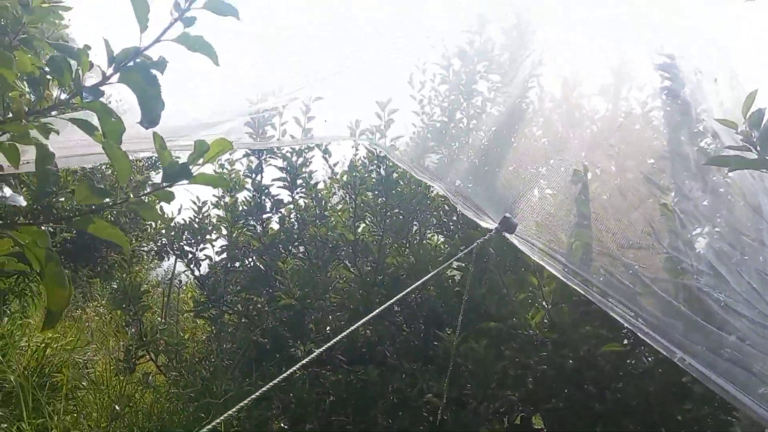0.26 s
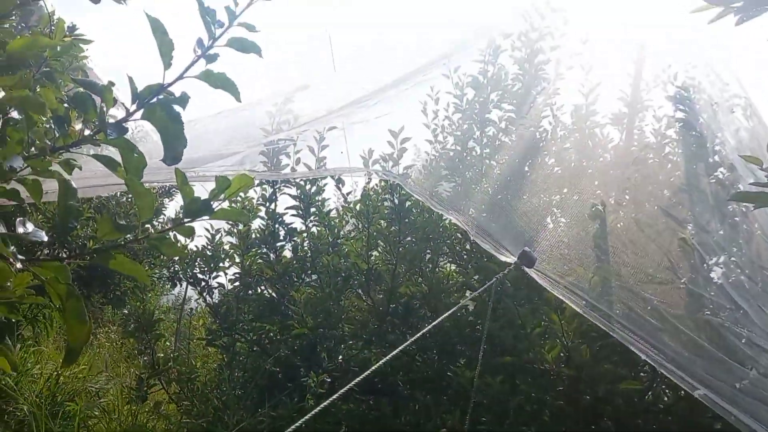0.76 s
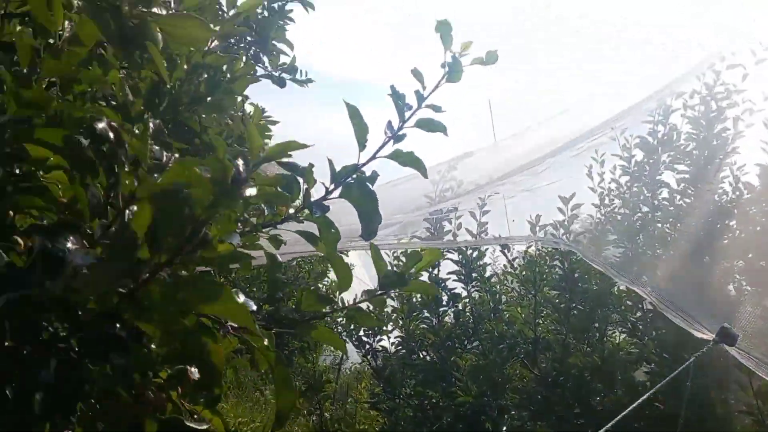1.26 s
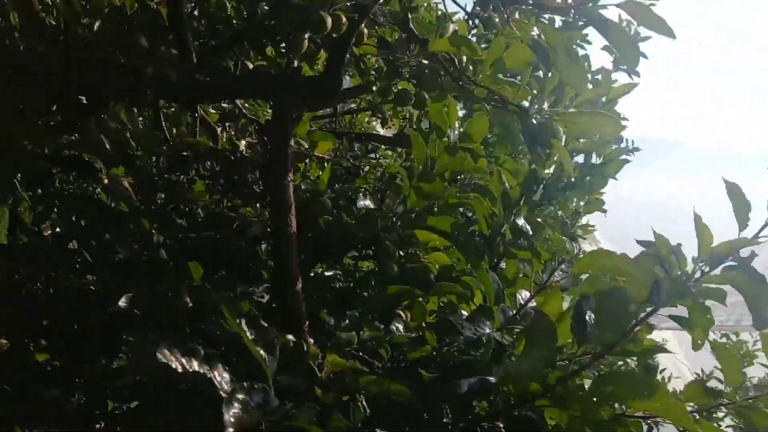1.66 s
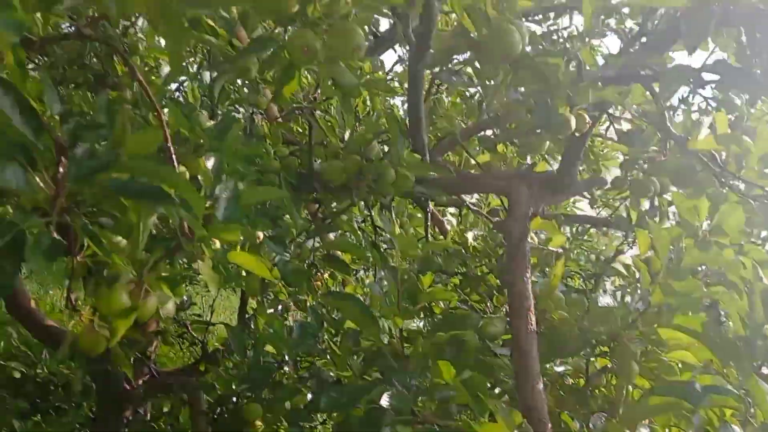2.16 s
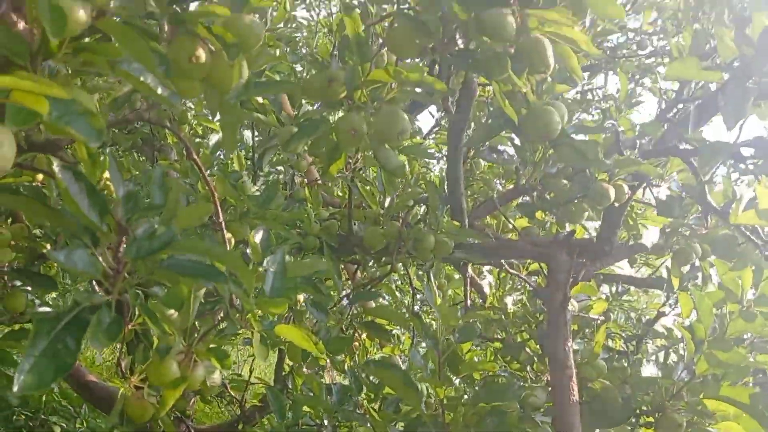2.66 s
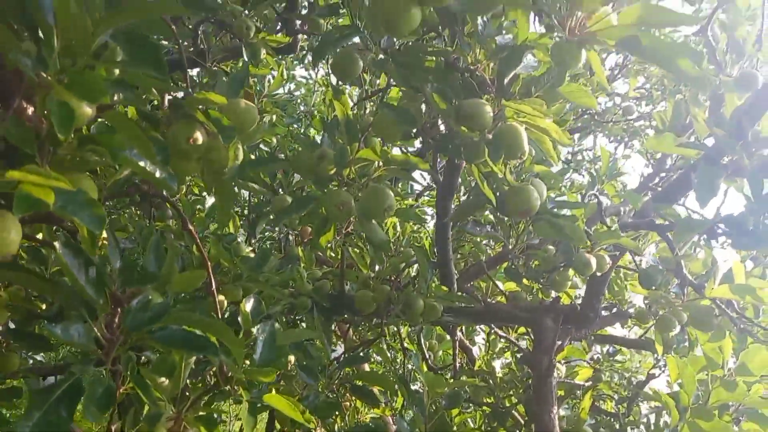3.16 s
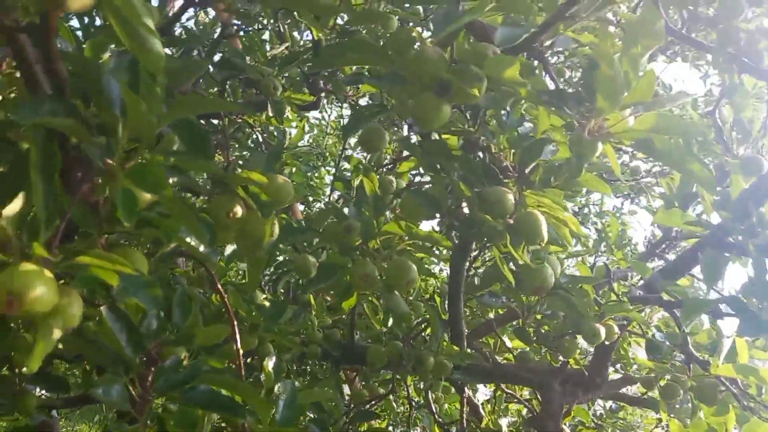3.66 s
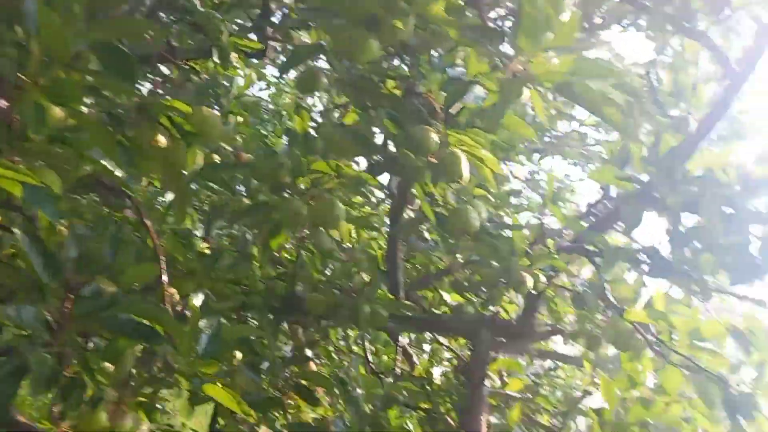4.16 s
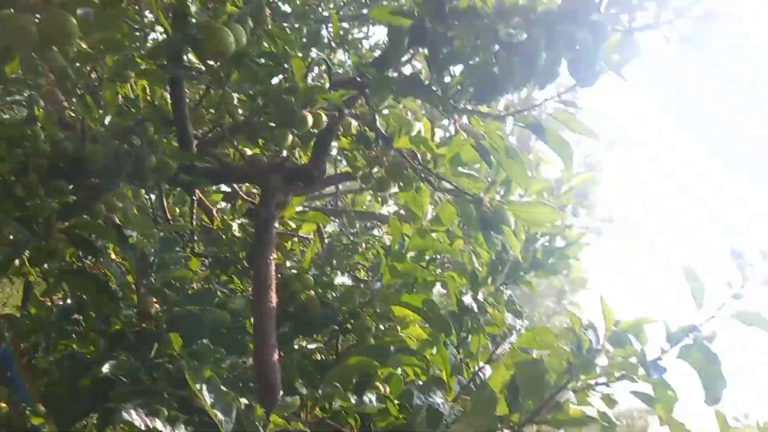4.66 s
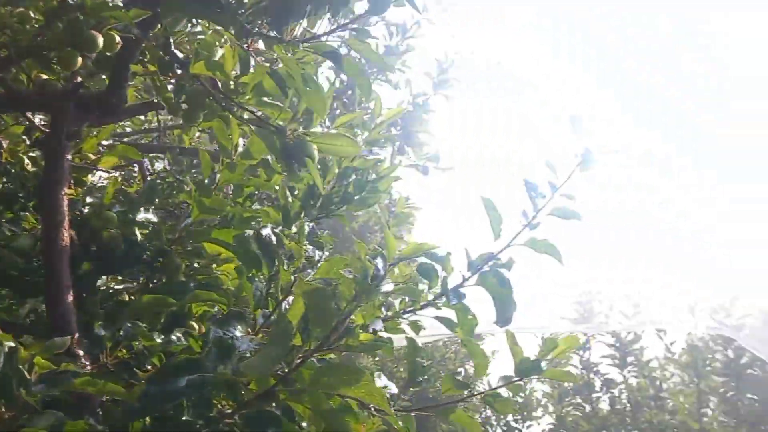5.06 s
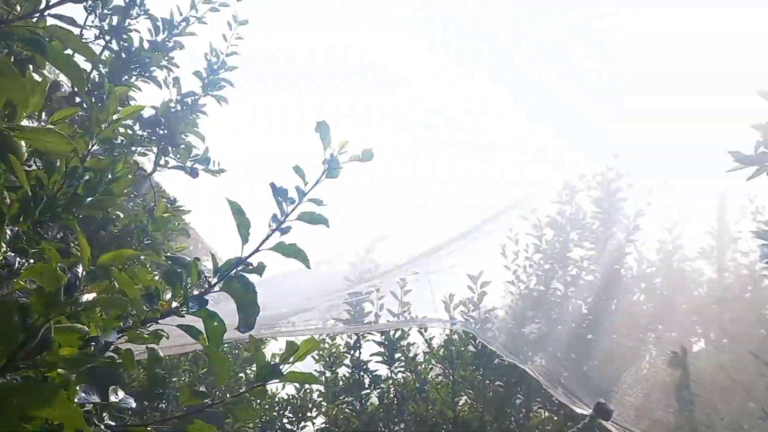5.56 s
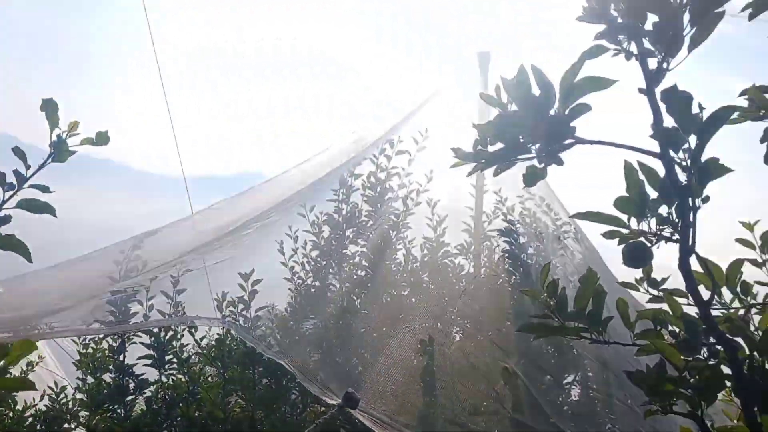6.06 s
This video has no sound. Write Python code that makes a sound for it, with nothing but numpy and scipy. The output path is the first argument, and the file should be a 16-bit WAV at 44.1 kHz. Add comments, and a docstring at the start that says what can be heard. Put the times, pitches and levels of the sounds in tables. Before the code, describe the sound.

In an open orchard, a hose-fed spray gun a few metres to the right hisses brightly in quick, uneven swells, slapping leaves and pattering dully on netting. Around three seconds it suddenly drops much quieter, then keeps pulsing softly. A small four-stroke pump engine throbs low and steady further off. A dull handling thud comes near two seconds; a faint bird chirps later. Handheld stereo phone.

```python
"""A spray gun's nozzle hisses, swelling with each pass; its jet rushes, slaps leaves and patters on netting.
A hose feeds it; it sweeps orchard trees a few metres from a phone, to the right, and ends nearly central.
Further off, the four-stroke single of the pump throbs over a low rumble, the case thuds and a bird chirps.
Water is droplet noise in bands, part direct and part scattered; the engine is a sum of firing-rate
harmonics; rumble and open air are filtered noise; thuds and chirps are enveloped sines."""
import sys
import numpy as np
from scipy import signal
from scipy.fft import rfft, irfft
from scipy.io import wavfile
from scipy.ndimage import uniform_filter1d, map_coordinates

SR = 44100
rng = np.random.default_rng(int(sys.argv[2]) if len(sys.argv) > 2 else 0)


def wrap_up_sound(samples):
    """Save the sound to the file named by the first command line argument, as 16-bit audio."""
    columns = np.atleast_2d(samples).T
    # keep every value between -1 and 1, then stretch to whole-number steps
    tamed = np.clip(columns, -1, 1)
    steps = np.round(tamed * 32767).astype(np.int16)
    wavfile.write(sys.argv[1], SR, steps)


N = 277830
T = np.arange(N) / SR
FREQS = np.maximum(np.fft.rfftfreq(N, 1 / SR), 1)
EARS = np.array([[1], [-1]])  # left, right

# Bearing of the gun. Each row: time in seconds, mean lag of the left port in ms.
BEARING_POINTS = [(0, 0.22), (.85, 0.24), (1.3, 0.28), (1.75, 0.51), (3.8, 0.53), (5.1, 0.51), (5.7, 0.21),
                  (6.0, 0.16), (6.3, 0.067)]
# Spray before passes and band trims; it drops away when the gun turns aside.
# Each row: time in seconds, nozzle hiss in dB, rush on foliage in dB, low wash in dB.
JET_LEVELS = [(0.0, -43.0, -44.5, -55.5), (0.9, -42.5, -46.5, -56), (1.2, -40.5, -45, -52.5),
              (2.05, -38, -43, -53.5), (2.3, -40.5, -44.0, -51), (3.16, -44, -47, -56),
              (3.2, -53.5, -58, -64.5), (4.05, -52.5, -54.5, -62.0), (5.3, -55, -59, -65),
              (5.55, -51.0, -50.5, -58.5), (5.97, -54.0, -56.0, -64.5), (6.3, -56, -54.5, -62.5)]


def undb(db):
    """Decibels to gain."""
    return 10 ** (np.asarray(db) / 20)


def curves(table):
    """Each column of a table, joined by straight lines in time."""
    times_s, *columns = np.transpose(table)
    return [np.interp(T, times_s, column) for column in columns]


def spectrum(points):
    """(Hz, value) points joined on a log-frequency axis."""
    hz, value = np.transpose(points)
    return np.interp(np.log(FREQS), np.log(hz), value)


def shape(x, gain):
    """Filter by a gain for every frequency."""
    return irfft(rfft(x) * gain, N)


def unit(x):
    """Scale so that the mean of the channels has standard deviation 1."""
    return x / np.std(np.atleast_2d(x).mean(axis=0))


def below(hz):
    """Gain of a smooth, steep low-pass."""
    return 1 / (1 + (FREQS / hz) ** 8)


def walk(rate_hz):
    """Random levels drawn at rate_hz and smoothed twice; standard deviation 1."""
    hold = max(int(SR / rate_hz), 1)
    steps = np.repeat(rng.standard_normal(N // hold + 1), hold)
    smooth = uniform_filter1d(uniform_filter1d(steps, hold), hold)
    return unit(smooth[:N])


def swell():
    """Change of the hiss in dB: every pass of the jet is one smooth, flat-topped arch."""
    # The jet swings towards the phone (+) or away (-) and back.
    # Each row: start in seconds, length in seconds, swell of the hiss in dB.
    passes = [(0.201, 0.119, 3.3), (0.351, 0.086, 2.2), (0.484, 0.052, 3.3), (0.564, 0.089, 2.1),
              (0.705, 0.192, 4.2), (0.927, 0.318, 4.3), (1.478, 0.095, -2.0), (1.597, 0.15, 1.8),
              (1.853, 0.217, 2.2), (2.099, 0.072, 1.7), (2.297, 0.114, -1.8), (2.418, 0.121, 2.5),
              (2.572, 0.12, 3.3), (2.724, 0.092, -1.7), (2.856, 0.202, 4.6), (3.284, 0.281, 4.8),
              (3.571, 0.076, -1.5), (3.827, 0.183, 3.6), (4.188, 0.044, 3.5), (4.312, 0.284, 5.3),
              (4.701, 0.414, 5.8), (5.362, 0.204, 3.8), (5.597, 0.217, 3.0), (5.792, 0.145, 7.4),
              (5.985, 0.053, 4.6), (6.048, 0.083, 3.7), (6.124, 0.18, 7.9)]
    flatness = 1.73  # wide mist cone levels off the top: near 0 = round arch, 3 = plateau
    total_db = 0
    for start_s, length_s, db in passes:
        along = np.clip((T - start_s) / length_s, 0, 1)
        total_db = total_db + db * np.tanh(flatness * np.sin(np.pi * along)) / np.tanh(flatness)
    return total_db


def droplets(spread_db, share):
    """Tiny impacts of uneven size, a power share of them sparse, merging into a hiss."""
    hits = rng.random(N) < 1 / 10
    sizes = undb(spread_db * np.minimum(rng.exponential(size=N), 5))
    impacts = unit(hits * sizes * rng.standard_normal(N))
    return np.sqrt(share) * impacts + np.sqrt(1 - share) * rng.standard_normal(N)


def mist():
    """Droplet noise at both ports: one part comes straight and lags on the left, leaves scatter the rest."""
    # Spray arriving straight from the gun. Each row: frequency in Hz, share of power 0-1.
    direct_share = [(500, .35), (1050, .67), (2000, .68), (2850, .74), (3800, .4), (5000, .3), (9000, .24),
                    (15000, .2)]
    straight, left, right = (droplets(spread_db=1.0, share=0.32) for _ in range(3))
    lag_ms = curves(BEARING_POINTS)[0] + 0.027 * walk(6)
    late = map_coordinates(straight, [np.arange(N) - lag_ms * SR / 1000], order=3, mode="wrap")
    share = spectrum(direct_share)
    direct = shape(np.array([late, straight]), np.sqrt(share))
    scattered = shape(np.array([left, right]), np.sqrt(1 - share))
    return direct + scattered


def spray():
    """Nozzle hiss, and rush and wash of the jet on trees; all follow passes and flutter as the jet breaks up."""
    # Spray colour, before each band is levelled. Each row: frequency in Hz, level in dB.
    spray_colour = [(250, -38), (600, -17), (950, -17), (1250, -13), (1550, -4.5), (1780, -8), (2060, -2.5),
                    (2450, -5), (3600, 0.5), (4800, 2.5), (6500, -1), (8300, -6), (12300, -3),
                    (16000, -4.5)]
    rush_follow, wash_follow = 1.43, 1.1  # dB per dB of hiss swell
    hiss_db, rush_db, wash_db = curves(JET_LEVELS)
    pass_db = swell()
    water = shape(mist(), undb(spectrum(spray_colour)))
    low, middle = below(2830), below(7050)
    flutter_db = 0.4 * walk(35) + 0.25 * walk(160)
    hiss_db = hiss_db + pass_db + 1.68 + 0.75 * walk(30)
    rush_db = rush_db + rush_follow * pass_db - 1.44 + 0.86 * walk(60)
    wash_db = wash_db + wash_follow * pass_db - 1.33 + 1.0 * walk(110)
    hiss = unit(shape(water, 1 - middle)) * undb(hiss_db)
    rush = unit(shape(water, middle - low)) * undb(rush_db)
    wash = unit(shape(water, low)) * undb(wash_db)
    return (hiss + rush + wash) * undb(flutter_db)


def slaps():
    """Brief band-limited splashes as the jet crosses leaves close by."""
    # Each row: peak time in seconds, level in dB before port shading, Gaussian sigma in seconds,
    # centre frequency in Hz, Gaussian width (sigma) in octaves.
    leaf_slaps = [(1.083, -39.5, 0.019, 3870, 0.22), (1.184, -52, 0.012, 1500, 0.97),
                  (2.143, -53, 0.023, 1790, 0.51), (5.491, -40.5, 0.013, 3100, 0.79),
                  (5.652, -52, 0.014, 2400, 0.44)]
    water, out = mist(), 0
    for peak_s, db, sigma_s, hz, octaves in leaf_slaps:
        band = np.exp(-0.5 * (np.log2(FREQS / hz) / octaves) ** 2)
        envelope = np.exp(-0.5 * ((T - peak_s) / sigma_s) ** 2)
        out = out + unit(shape(water, band)) * undb(db) * envelope
    return out


def netting():
    """The stretched net answers the water with a dull patter that follows the passes."""
    # Each row: time in seconds, level between passes in dB.
    net_levels = [(0, -74.5), (1.0, -70), (1.5, -63), (2.35, -68.5), (2.9, -80), (5.35, -74), (5.5, -67),
                  (6.3, -74.5)]
    net_follow = 0.96  # dB per dB of hiss swell
    patter = np.array([droplets(spread_db=-2.5, share=0.27) for _ in range(2)])
    body_db = spectrum([(150, -25), (400, -4), (650, 3), (1000, -6), (1600, -2), (4000, -50)])
    return unit(shape(patter, undb(body_db))) * undb(curves(net_levels)[0] + net_follow * swell())


def pump():
    """Each cycle an exhaust puff, then an intake gulp; trees scatter the upper notes differently to each ear."""
    # Engine speed before jitter. Each row: time in seconds, firings per second.
    firing_rate = [(0, 33.92), (1.1, 34.02), (1.7, 33.88), (1.95, 33.5), (2.35, 33.85), (2.62, 33.35),
                   (3.0, 33.75), (3.35, 34.0), (3.6, 33.8), (4.05, 33.85), (4.3, 33.6), (4.5, 33.75),
                   (4.72, 33.52), (5.25, 34.1), (5.6, 33.92), (5.9, 33.47), (6.3, 33.6)]
    # Pump loudness before a fixed trim. Each row: time in seconds, level in dB.
    throb_levels = [(0, -43.4), (3.1, -42.5), (3.25, -44.5), (6.3, -43.5)]
    # Exhaust harmonics. Each row: multiple of the firing rate, mean relative level in dB.
    exhaust_notes = [(5, 2), (6, 1), (7, -10), (8, -13.5), (9, -12), (10, -25), (11, -37), (12, -29),
                     (13, -26.5), (18, -24.5)]
    # Intake harmonics. Each row: multiple of the firing rate, relative level in dB.
    intake_notes = [(1, -25), (2, -0.5), (3, 0.5), (4, -57)]
    cycles = np.cumsum(curves(firing_rate)[0] * (1 + 0.0022 * walk(29.93))) / SR
    puff = 0
    for k, db in exhaust_notes:
        waver_db = 0.063 * k * walk(24.94)  # higher notes waver more
        puff = puff + undb(db + waver_db) * np.cos(2 * np.pi * k * cycles)
    intake_cycles = cycles - 0.3
    gulp = sum(-undb(db) * np.sin(2 * np.pi * k * intake_cycles) for k, db in intake_notes)
    unevenness_db = 0.35 * walk(30)
    note = unit(puff + gulp) * undb(unevenness_db)
    scatter_db = spectrum([(60, -41.0), (200, -19), (320, -18), (600, -5)])
    scattered = shape(np.roll(note, int(0.011 * SR)), undb(scatter_db))  # 11 ms late
    return (note + EARS * scattered) * undb(curves(throb_levels)[0] - 1.5)


def rumble():
    """Low, rough noise: a steady part from the machine, and a part that swells with the blast of the spray."""
    # Each row: frequency in Hz, relative level in dB.
    rumble_colour = [(15, -31), (30, -12), (48, -7.5), (90, -1.5), (140, -1), (230, -4), (320, -6.5),
                     (450, -17.5), (700, -26), (1500, -35.5), (4000, -60)]
    blast_db = uniform_filter1d(curves(JET_LEVELS)[0] + swell(), SR // 4)
    gain = np.hypot(undb(-59.0), undb(blast_db - 16.5))
    colour = undb(spectrum(rumble_colour))
    middle, side = (unit(shape(rng.standard_normal(N), colour)) for _ in range(2))
    width = undb(-8.5)
    return (middle + width * EARS * side) * gain * undb(1.0 * walk(16))


def bumps():
    """Dull, short thuds of the phone's case: sines under Gaussian envelopes."""
    # Each row: peak time in seconds, level in dB, Gaussian sigma in seconds, frequency in Hz.
    case_thuds = [(1.905, -43, .011, 225), (1.922, -41, .02, 88)]
    out = 0
    for peak_s, db, sigma_s, hz in case_thuds:
        envelope = np.exp(-0.5 * ((T - peak_s) / sigma_s) ** 2)
        out = out + undb(db) * envelope * np.sin(2 * np.pi * hz * (T - peak_s))
    return out


def bird():
    """Short falling whistles of a far bird: gliding sines under half-sine envelopes."""
    # Each row: start in seconds, length in seconds, start pitch in Hz, end pitch in Hz, peak level in dB.
    chirps = [(4.24, .04, 3850, 3450, -63), (4.703, .06, 4370, 4290, -53)]
    out = 0
    for start_s, length_s, start_hz, end_hz, db in chirps:
        along = np.clip((T - start_s) / length_s, 0, 1)
        hz = start_hz + (end_hz - start_hz) * along
        out = out + undb(db) * np.sin(np.pi * along) * np.sin(2 * np.pi * np.cumsum(hz) / SR)
    return out


def air():
    """Faint outdoor noise from all sides: independent filtered noise in each channel."""
    # Each row: frequency in Hz, relative level in dB.
    air_colour = [(20, 11), (80, 8), (250, 12.5), (600, -0.5), (950, -26), (2000, 7.5), (8000, -14),
                  (16000, -37)]
    noise = shape(rng.standard_normal((2, N)), undb(spectrum(air_colour)))
    return unit(noise) * undb(-62.5 + 0.8 * walk(2.15))


def scene():
    """Spray and slaps to the right, the phone shading its left port; the other layers around them."""
    # The ports differ in colour. Each row: frequency in Hz, left minus right in dB.
    port_colour = [(500, 0.5), (2000, 2), (4500, -0.6), (7000, -0.5), (8500, 2), (11500, 0.1), (13500, -3),
                   (15500, -2)]
    shade_db_per_ms = 3.5
    pan_db = -shade_db_per_ms * curves(BEARING_POINTS)[0]
    water = shape(spray() + slaps(), undb(EARS * spectrum(port_colour) / 2))
    water = water * undb(EARS * pan_db / 2)
    return water + netting() + pump() + rumble() + bumps() + bird() + air()


def record(dry):
    """The phone cuts the top steeply: an elliptic low-pass."""
    top_hz = 15850
    sos = signal.ellip(12, 0.1, 75, top_hz, fs=SR, output="sos")
    return signal.sosfilt(sos, dry)


dry = scene()
out = record(dry)
wrap_up_sound(out)
```